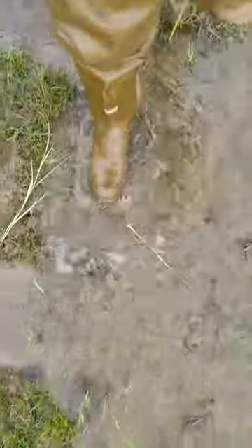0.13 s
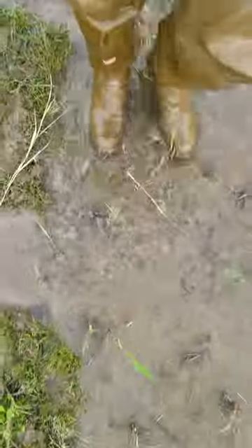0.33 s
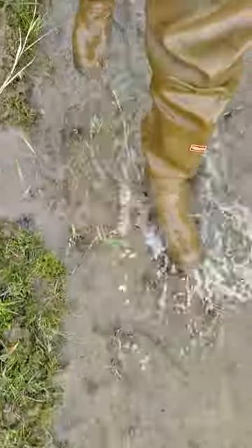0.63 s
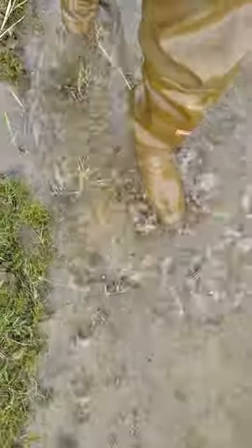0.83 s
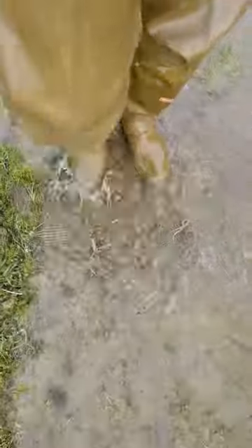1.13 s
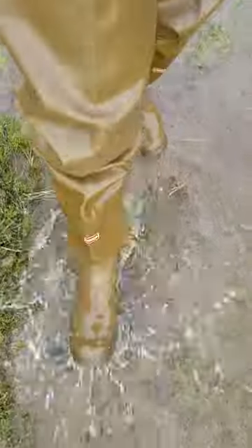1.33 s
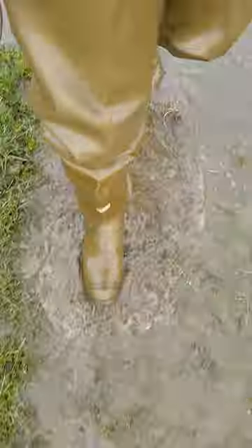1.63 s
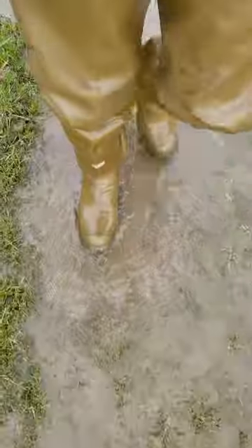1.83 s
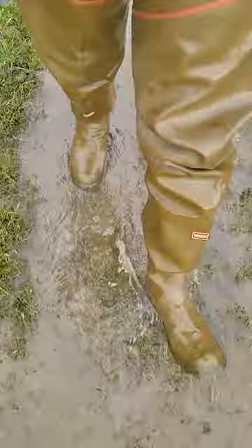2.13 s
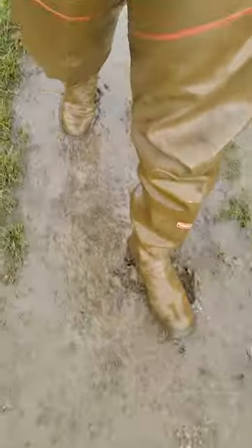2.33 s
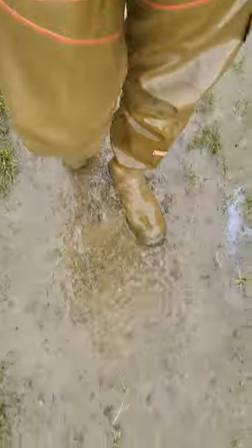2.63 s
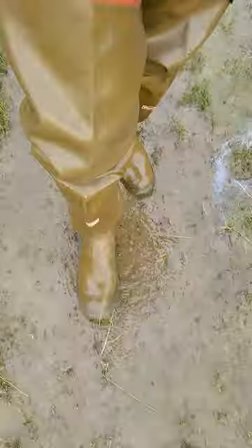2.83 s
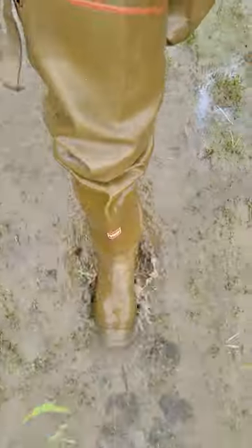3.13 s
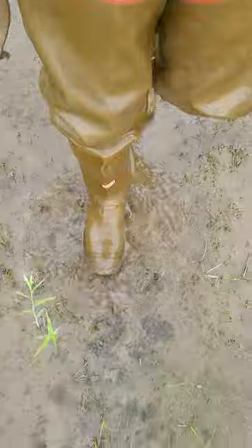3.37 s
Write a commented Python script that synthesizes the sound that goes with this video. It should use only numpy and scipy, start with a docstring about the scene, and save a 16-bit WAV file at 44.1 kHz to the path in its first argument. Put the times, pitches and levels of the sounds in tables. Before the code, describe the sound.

Rubber boots wade through shallow muddy water, heard in stereo from chest height. Splashing begins at once, with strong sloshes and wet slaps around 0.5 to 1.0 s and again from 1.25 to 1.7 s, full of squelches and bubble plops. Lighter splashes come at 2.05 to 2.45 s with ticking drops, then near quiet until a sharp splash at 3.25 s. Low outdoor rumble, faint air and high hiss continue throughout.

```python
"""Shallow muddy water, heard from chest height through two microphone ports as rubber waders walk.
Each push of a boot throws clouds of tiny dying tones over noise: deep churn, slosh and fine spray.
Soles slap as pulses in froth, air pockets gulp as ragged gliding tones, single bubbles plop as
climbing tones and fallen drops tick. Legs and ground answer with short noise tails. Behind lie a low
outdoor rumble, faint open air and a steady, very high hiss, all shaped noise, and a trickle of tiny bubbles."""
import sys
import numpy as np
from scipy import signal
from scipy.fft import rfft, irfft, next_fast_len
from scipy.io import wavfile
from scipy.ndimage import map_coordinates

SR = 44100
rng = np.random.default_rng(int(sys.argv[2]) if len(sys.argv) > 2 else 0)


def materialize(psi):
    """Save the field psi as 16-bit PCM at rate SR to the path in sys.argv[1].

    A 1-D psi becomes a single channel; in a 2-D psi each row is a channel.
    """
    bounded = np.clip(np.atleast_2d(psi).T, -1, 1)
    quanta = np.round(bounded * 32767).astype(np.int16)
    wavfile.write(sys.argv[1], SR, quanta)


N = 154350

BUBBLE_RISE = 0.1  # pitch has climbed by twice this fraction after one t60
LAG_S, LAG_SPREAD_S = .00016, .00022  # the left port hears the water later; scatter of that lag in clouds
SIDES = np.array([[1], [-1]])  # left, right


def amp(db):
    """Decibels to amplitude."""
    return 10 ** (np.asarray(db) / 20)


def unit(x):
    """Scale to rms 1."""
    return x / np.sqrt(np.mean(x ** 2) + 1e-20)


def along(points, hz):
    """Read (frequency [Hz], value) points on a log frequency axis."""
    f, v = np.transpose(points)
    return np.interp(np.log(hz + 1), np.log(f + 1), v)


def level_at(points):
    """Read (time [s], value) points at every sample."""
    return np.interp(np.arange(N) / SR, *np.transpose(points))


def dying(t, t60):
    """Exponential decay by 60 dB in t60 seconds."""
    return np.exp(-np.log(1000) * t / t60)


def filtered(x, response):
    """Multiply the spectrum of x by a response of frequency."""
    m = next_fast_len(N + SR // 2)  # padded against wrap-around
    return irfft(rfft(x, m) * response(np.fft.rfftfreq(m, 1 / SR)), m)[..., :N]


def wobble(rate):
    """A smooth random curve with rate knots a second."""
    knots = rng.standard_normal(int(N * rate / SR) + 4)
    return map_coordinates(knots, [np.arange(N) * rate / SR])


def add(track, s, sound):
    """Lay a sound into a track at s seconds."""
    part = track[max(0, round(s * SR)):][:len(sound)]
    part += sound[:len(part)]


def noise(spectrum, alike):
    """Stereo noise of rms 1; alike gives the left-right correlation by frequency."""
    def mid_and_side(hz):
        turn = np.arccos(np.clip(along(alike, hz), -1, 1)) / 2
        return amp(along(spectrum, hz)) * [np.cos(turn), np.sin(turn)]

    mid, side = filtered(rng.standard_normal((2, N)), mid_and_side)
    return unit(np.array([mid + side, mid - side]))


def ring(t, hz, t60, onset_s):
    """A bubble: a dying tone that climbs as it nears the surface."""
    t = np.maximum(t, 0)
    tone = np.sin(2 * np.pi * hz * t * (1 + BUBBLE_RISE * t / t60))
    return tone * dying(t, t60) * (1 - np.exp(-t / onset_s))


def cloud(spectrum, low_hz, high_hz, cycles, spread_db, wash, count, size):
    """Stereo cloud of count tiny bubbles, each size samples long, on a wash of noise, rms 1."""
    when, pitch, strength, life, balance, lag = rng.random((count, 6)).T[:, :, None]
    hz = low_hz * (high_hz / low_hz) ** pitch
    gain = amp(-spread_db * np.log(1 - .97 * strength)) * hz / low_hz
    t60 = cycles * (.5 + life) / hz
    start = ((np.arange(count)[:, None] + when) * N / count).astype(int)  # one in each equal slot
    at = start + np.arange(size)
    pair = []
    for side in (1, -1):
        delay = side * (LAG_S / 2 + LAG_SPREAD_S * (2 * lag - 1))
        t = np.arange(size) / SR - 2 * LAG_SPREAD_S - delay
        grains = gain * (1 + side * (balance - .5) / 2) * ring(t, hz, t60, .5 / hz)
        pair.append(np.bincount(at.ravel(), grains.ravel())[:N])
    bubbles = unit(filtered(np.array(pair), lambda f: amp(along(spectrum, f))))
    return unit(bubbles + wash * noise(spectrum, [(1000, 0.033)]))


def background():
    """Shaped noise for rumble, open air and a hiss that is stronger on the left; a bubble cloud for trickle."""
    # spectra of distant rumble, open air, hiss and trickle: (frequency [Hz], relative level [dB])
    rumble_spectrum, air_spectrum = [(15, -5), (25, -16.5), (55, 2), (100, -3.5), (170, -10.5),
                                     (250, -14.5), (400, -34.5), (900, -44)], [(100, -12), (350, -0.5), (700, -2.5), (1300, -6),
                                                     (2400, -12), (3200, -18.5), (6500, -15), (9000, -29),
                                                     (16000, -45)]
    hiss_spectrum, trickle_spectrum = [(6000, -69), (9500, -41), (11000, -22.5), (12500, -10.5),
                                       (14000, -3.5), (15400, 6.5), (16000, -4)], [(500, -9), (1200, -1), (2500, 2), (4500, -11.5),
                                                     (12000, -12)]
    # how alike the open air is at the two ports: (frequency [Hz], correlation [-1 to 1])
    air_alike = [(150, 1), (300, -0.18), (640, -0.54), (1400, -0.75), (3100, -0.15), (8000, -0.34)]
    # course of the rumble before a 1 dB lift: (time [s], level [dB])
    rumble_level = [(0.0, -33), (0.27, -34.5), (0.33, -36.5), (1.0, -38.5), (1.1, -32.5), (1.15, -38),
                    (1.32, -35), (1.34, -41), (1.39, -34.5), (1.6, -40.5), (1.64, -37.5), (3.14, -36.5),
                    (3.24, -38), (3.39, -36.5), (3.43, -43), (3.5, -35)]
    rumble_alike = [(25, .4), (45, 0.75), (70, 0.97), (130, 1.0), (300, .75)]
    rumble = amp(1 + level_at(rumble_level)) * noise(rumble_spectrum, rumble_alike)
    air = amp(-44) * noise(air_spectrum, air_alike)
    hiss = amp(-30.5 + 2 * SIDES) * noise(hiss_spectrum, [(10000, 0)])  # only the hiss leans left
    # stirred water between steps, running throughout
    trickle = amp(-58) * cloud(trickle_spectrum, low_hz=790, high_hz=6900, cycles=16, spread_db=5.0,
                               wash=0.29, count=420, size=1200)
    return rumble + air + trickle + hiss


def splashes():
    """Each boot push swells, holds and dies, driving churn, slosh and spray whose level flickers slightly."""
    # water pushed by a boot, before panning:
    # (start [s], rise [s], hold [s], t60 [s], slosh level [dB], spray level [dB])
    pushes = [(-.02, 0.018, .15, 0.31, -29.5, -32.5), (0.282, .03, 0.085, 0.9, -52, -46.5),
              (0.45, 0.044, 0.13, 0.25, -27, -33.5), (0.654, 0.026, 0.057, 0.16, -36.5, -38),
              (0.743, 0.033, 0.11, 0.53, -27.5, -30), (0.911, 0.024, 0.039, 0.17, -26, -43),
              (1.042, 0.022, 0.11, 0.83, -54.5, -54), (1.199, 0.011, 0.084, 0.26, -42, -38),
              (1.261, 0.0082, 0.02, 0.18, -29.5, -30), (1.291, 0.023, 0.15, 0.73, -32.5, -38.5),
              (1.541, 0.089, 0.034, 0.18, -32, -30.5), (1.673, .01, 0.046, .45, -42.5, -38.5),
              (2.064, 0.0049, 0.05, 0.25, -29.5, -35), (2.177, 0.011, 0.006, 0.15, -29, -26.5),
              (2.257, 0.088, 0.031, 0.19, -59, -42.5), (2.384, .05, 0.018, 0.28, -33, -30.5),
              (2.981, 0.049, 0.015, 0.089, -55, -42), (3.244, .02, 0.019, 0.16, -27, -28),
              (3.294, .02, 0.072, 0.31, -37.5, -43)]
    # spectra of slosh, fine spray and deep churn: (frequency [Hz], relative level [dB])
    slosh_spectrum, spray_spectrum, churn_spectrum = [(150, -22), (330, 14.5), (470, -12.5), (620, -15),
                                                      (850, -6), (1300, 4.5), (1750, -0.5), (2300, 5),
                                                      (2750, 0), (3200, -18), (5000, -4)], [(800, -13), (2500, 2.5), (3800, 1),
                                                                     (5200, -4.5), (6400, -1.5), (8000, -4),
                                                                     (8800, -11), (12000, -9), (16000, -17)], [(150, -60), (330, -5.5),
                                                                                    (470, -5.5), (750, 4),
                                                                                    (1100, 5), (2000, -47)]
    # depth of churn under the slosh: (time [s], level against the slosh [dB])
    churn_level = [(0, -4), (.15, -7), (.5, -26), (.6, -10), (.8, -29), (.95, -8), (1.28, -9), (1.45, -8.5),
                   (2.1, -23), (3.3, -20)]
    t, slosh_power, spray_power = np.arange(N) / SR, np.zeros(N), np.zeros(N)
    for s, rise, hold, t60, slosh_db, spray_db in pushes:
        swell = np.clip((t - s) / rise, 0, 1)
        shape = swell * dying(np.maximum(t - s - rise - hold, 0), t60)
        slosh_power += (amp(slosh_db) * shape) ** 2
        spray_power += (amp(spray_db) * shape) ** 2
    slosh = cloud(slosh_spectrum, low_hz=700, high_hz=3327, cycles=22.2, spread_db=3.0,
                  wash=0.24, count=3200, size=1500)
    churn = cloud(churn_spectrum, low_hz=306, high_hz=1012, cycles=7.9, spread_db=6,
                  wash=0.81, count=900, size=1800)
    spray = cloud(spray_spectrum, low_hz=2277, high_hz=14600, cycles=21, spread_db=3,
                  wash=0.89, count=5000, size=500)
    body = slosh + amp(level_at(churn_level)) * churn
    flicker = amp(0.76 * wobble(110))
    return flicker * (np.sqrt(slosh_power) * body + np.sqrt(spray_power) * spray)


def plops():
    """Larger bubbles ring one by one, each climbing in pitch in its own place."""
    # single bubbles: (time [s], starting pitch [Hz], level [dB], t60 [s], left over right [dB])
    bubbles = [(.003, 954, -22, 0.03, -14), (.026, 1006, -22, 0.037, -11), (0.062, 815, -24, 0.039, -15),
               (.107, 746, -26, .06, -10), (.128, 470, -22, 0.042, 4), (.196, 1016, -28.5, 0.034, -13),
               (0.211, 1340, -28.5, 0.042, -7), (0.439, 1570, -31, 0.054, 8), (0.486, 1300, -18, 0.056, 0),
               (0.507, 1377, -21, 0.031, 11), (.525, 2550, -17, 0.019, 17), (.602, 733, -23.5, 0.03, 6),
               (.625, 2320, -14.5, .025, 17), (.671, 1047, -14.5, 0.021, 13), (0.722, 1374, -26, .05, -3),
               (0.797, 1326, -20, 0.053, -11), (.862, 2260, -10.5, 0.019, 11), (.947, 409, -17, .05, -2),
               (.986, 774, -26, 0.047, 10), (1.303, 1240, -14, 0.032, -4), (1.366, 797, -22.5, 0.033, 3),
               (1.406, 723, -15.5, 0.034, 4), (1.41, 1640, -10.5, 0.026, -6),
               (1.504, 1310, -23, 0.029, -10), (1.545, 1150, -23, 0.021, -14),
               (1.623, 826, -10.5, 0.027, -7.5), (1.642, 2670, -10, .025, 4), (1.691, 1265, -23, 0.027, -8),
               (1.859, 1266, -24.5, 0.026, 2), (1.952, 1194, -28.5, 0.025, -2), (2.342, 2480, -24, .02, 4),
               (2.705, 970, -25.5, 0.01, 6), (3.128, 1290, -29, 0.018, 0), (3.16, 2550, -24, 0.014, 10),
               (3.254, 1370, -17, 0.018, -13), (3.26, 2260, -3.5, 0.016, -6.5),
               (3.341, 1320, -18, 0.039, -12), (3.391, 1084, -35.5, 0.056, -12),
               (3.443, 2300, -33, 0.039, -2)]
    out, t = np.zeros((2, N)), np.arange(SR // 8) / SR
    for s, hz, db, t60, pan_db in bubbles:
        for track, side in zip(out, (1, -1)):
            sound = ring(t - side * LAG_S / 2, hz, t60, onset_s=0.0011)
            add(track, s, amp(db + side * pan_db / 2) * sound)
    return out


def scatter(x):
    """Legs and ground answer with a short noise tail, new at each port and in each of 14 stretches."""
    t, out = np.arange(SR // 6) / SR, np.zeros((2, N))
    for part in np.array_split(np.arange(N), 14):
        for side in out:
            tail = rng.standard_normal(len(t)) * dying(t, .07)
            add(side, part[0] / SR, signal.fftconvolve(x[part], tail / np.linalg.norm(tail)))
    return out


def slaps():
    """A brief dying pulse of trapped air with a noise crack, inside a puff of froth."""
    # sharp slaps and bursts of water, before panning: (time [s], pulse level [dB], pitch [Hz])
    hits = [(0.0366, -22, 2400), (0.065, -16, 1550), (.143, -16, 1600), (0.47, -13.5, 2800),
            (.527, -16, 2500), (.544, -17, 2290), (.563, -10.5, 4700), (0.619, -13, 1350),
            (.626, -16, 2340), (0.754, -14.5, 1590), (0.773, -5, 2720), (.8625, -9, 2300),
            (0.87, -22, 2600), (.925, -14.5, 1100), (.944, -16, 2170), (0.957, -11, 4300),
            (0.9696, -12.5, 1610), (1.274, -9, 4300), (1.282, -11.5, 1530), (1.379, -11, 3500),
            (1.41, -14, 1710), (1.419, -10.5, 2380), (1.461, -19, 2380), (1.6235, -14, 1310),
            (1.638, -15, 1220), (1.6455, -16, 2940), (1.779, -22.5, 1330), (2.0682, -20.5, 1540),
            (2.11, -14.5, 2110), (2.1892, -11, 1100), (2.435, -37, 2200), (3.2603, -10.5, 2230),
            (3.266, -7.5, 3240)]
    lead_s, tail_s = 0.0015, 0.0022  # froth swells before a slap and dies after it
    out, t = np.zeros(N), np.arange(-SR // 50, SR // 25) / SR
    after = np.maximum(t, 0)
    for s, db, hz in hits:
        pulse = np.sin(2 * np.pi * hz * after) * np.exp(-after * hz / 1.8)  # dies over 1.8 cycles
        band = signal.butter(1, [hz / 2, 2 * hz], "band", fs=SR)
        hush = unit(signal.lfilter(*band, rng.standard_normal(len(t))))
        froth = .13 * hush * np.exp(np.minimum(t, 0) / lead_s - after / tail_s)
        crack = 0.24 * rng.standard_normal(len(t)) * np.exp(-after / 0.0009) * (t > 0)
        add(out, s + t[0], amp(db) * (pulse + froth + crack))
    return out


def gulps():
    """A pocket of air gives a ragged tone that glides as the pocket shrinks or grows."""
    # air pockets that change size under the sole, before panning and waver:
    # (start [s], length [s], first pitch [Hz], last pitch [Hz], level [dB])
    pockets = [(0.841, .034, 720, 1470, -22.5), (.945, .04, 330, 1000, -23), (1.26, .11, 1700, 858, -28),
               (1.403, 0.025, 500, 636, -23), (1.627, 0.0383, 800, 696, -34.5),
               (2.087, .055, 2400, 2018, -26)]
    breadth_hz = 215.5  # width of the turbulence around the tone
    out, waver = np.zeros(N), 1 + 0.0716 * wobble(350)
    froth = 1 + 0.34 * (wobble(2 * breadth_hz) + 1j * wobble(2 * breadth_hz))
    for s, length, first_hz, last_hz, db in pockets:
        within = np.clip((np.arange(N) / SR - s) / length, 0, 1)
        hz = (first_hz + (last_hz - first_hz) * within) * waver
        tone = (froth * np.exp(2j * np.pi * np.cumsum(hz) / SR)).real
        out += amp(db) * np.sqrt(2 * within * (1 - within)) * tone
    return out


def drops():
    """Each falling drop ticks on the surface: a few cycles of tone with a little noise."""
    # drops that fall back, before panning: (time [s], level [dB], pitch [Hz])
    ticks = [(1.22, -39, 4500), (1.248, -25, 3200), (1.646, -10, 3670), (1.7775, -33, 3930),
             (1.848, -32, 4460), (1.876, -29, 8400), (2.262, -24, 2920), (2.326, -20.5, 3500),
             (2.401, -18, 2460), (2.421, -26, 2050), (2.48, -16, 3300), (2.514, -35, 2200),
             (2.446, -22, 6100), (2.993, -22.5, 7000), (3.175, -19.5, 4000), (3.21, -24, 3180),
             (3.267, -9.5, 6230), (3.375, -26, 2500), (3.406, -28, 4500)]
    out, t = np.zeros(N), np.arange(SR // 50) / SR
    for s, db, hz in ticks:
        tone = np.sin(2 * np.pi * hz * t) + 0.16 * rng.standard_normal(len(t))
        add(out, s, amp(db) * np.exp(-t * hz / 2.3) * tone)  # dies over 2.3 cycles
    return out


def scene():
    """The water lies just below two microphone ports and reaches the left one slightly later."""
    # where the water lies between the ports: (time [s], left over right [dB])
    pan = [(0, -3), (.6, 1), (.85, -1), (1.4, -3), (2.1, -2.5), (2.2, -2), (2.45, -2), (3.3, -3)]
    near, bubbles = slaps() + drops() + gulps(), plops()
    near_pair = filtered(near, lambda hz: np.exp(-1j * np.pi * hz * LAG_S * SIDES))
    answer = amp(-4) * scatter(near + bubbles.mean(0))
    water = splashes() + near_pair + answer
    return water * amp(SIDES * level_at(pan) / 2) + bubbles + background()


def record(dry):
    """The microphones' signal keeps nothing from 15.9 kHz up."""
    return filtered(dry, lambda hz: hz < 15900)


dry = scene()
out = record(dry)
materialize(out)
```